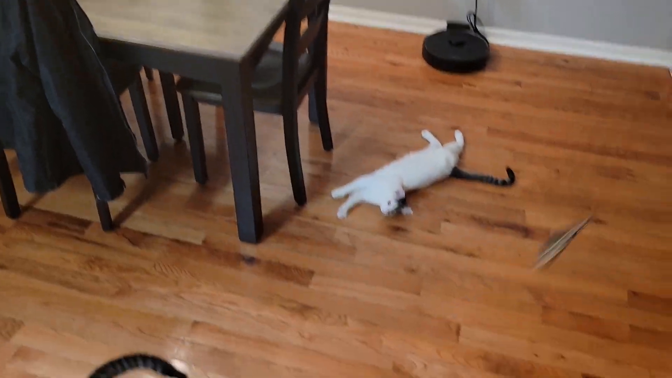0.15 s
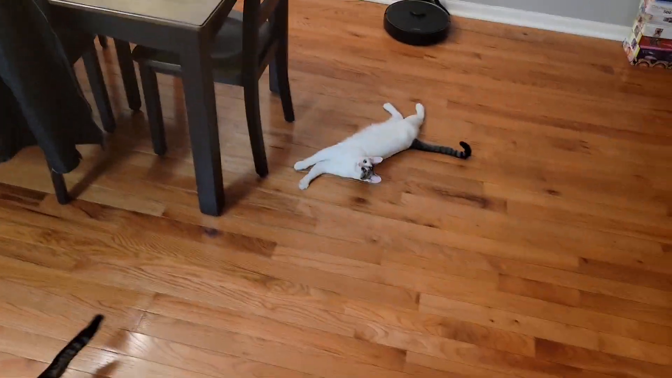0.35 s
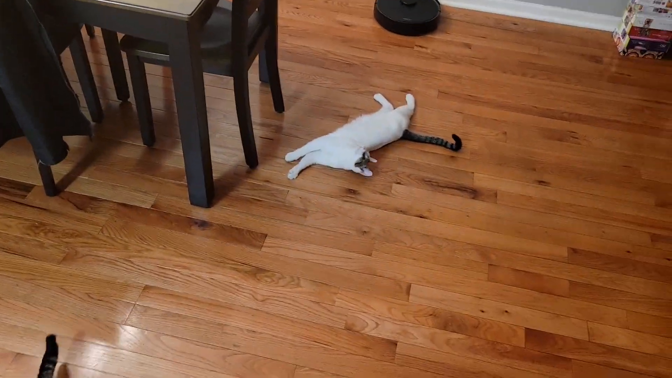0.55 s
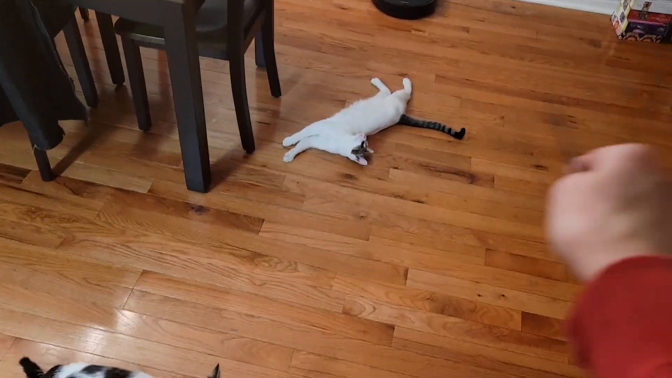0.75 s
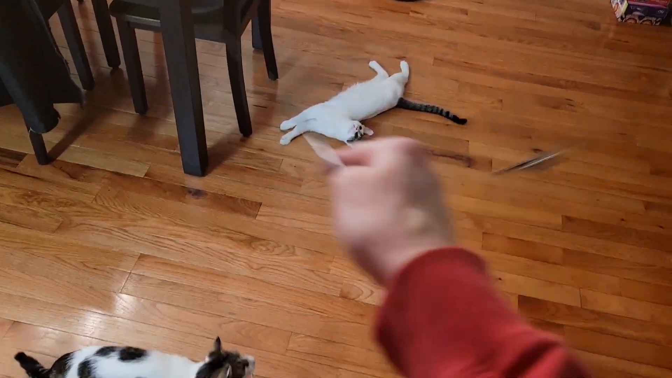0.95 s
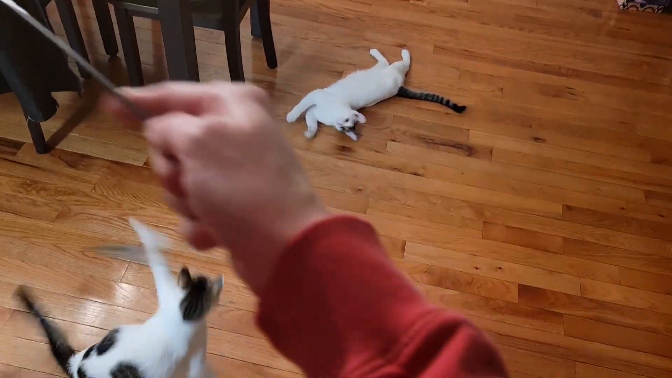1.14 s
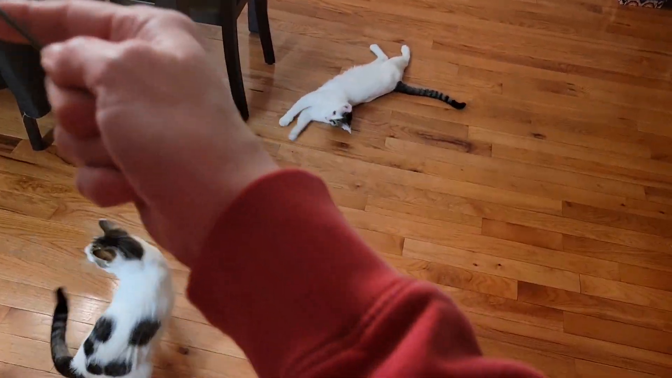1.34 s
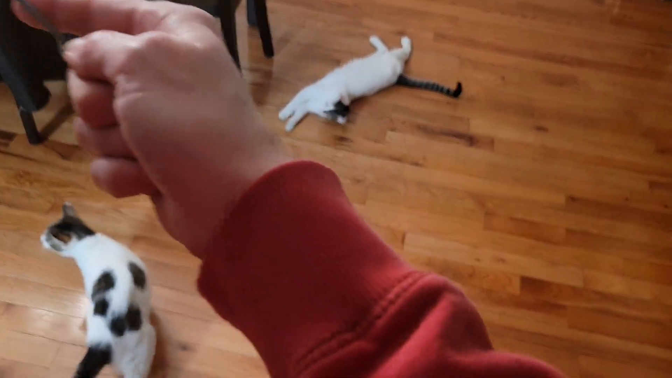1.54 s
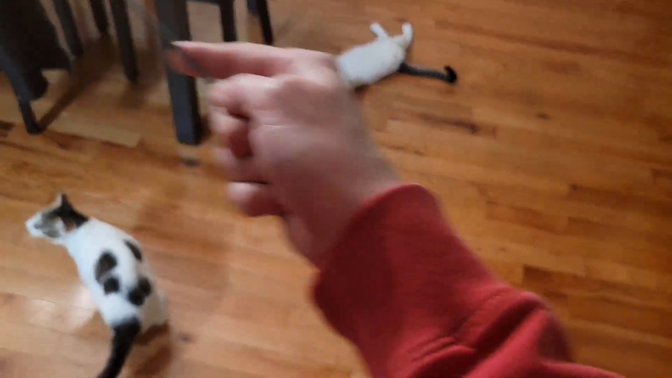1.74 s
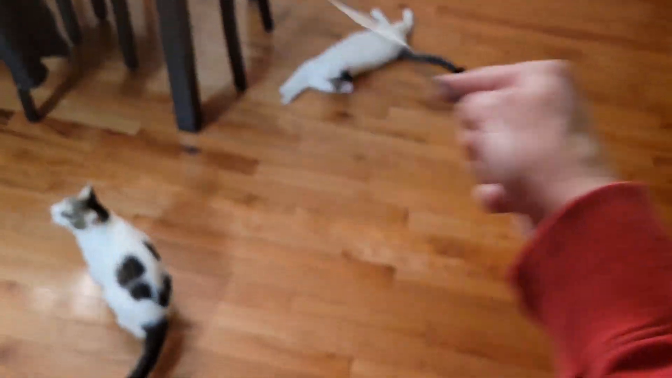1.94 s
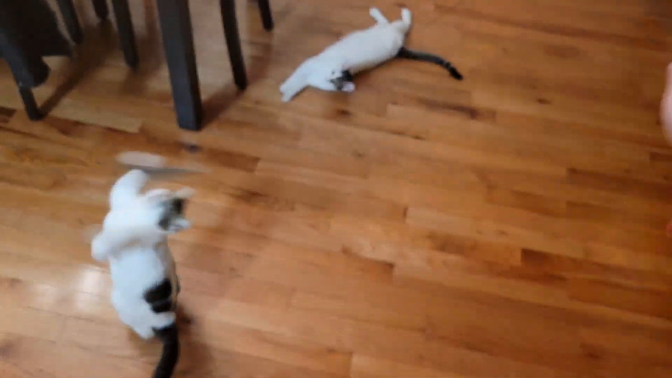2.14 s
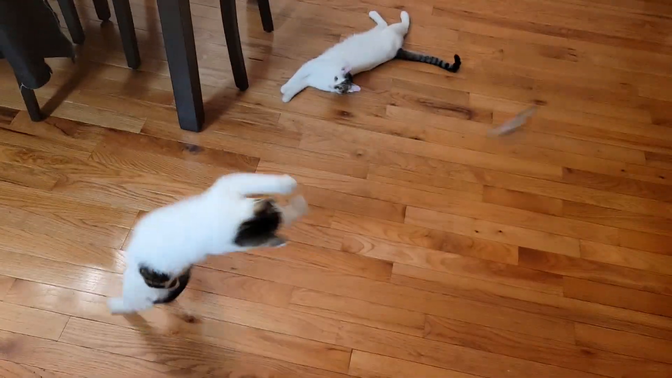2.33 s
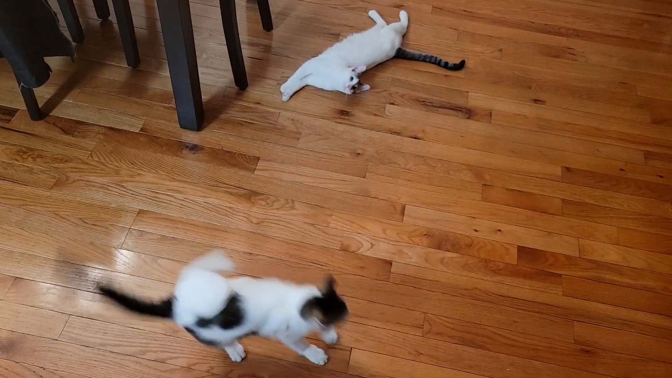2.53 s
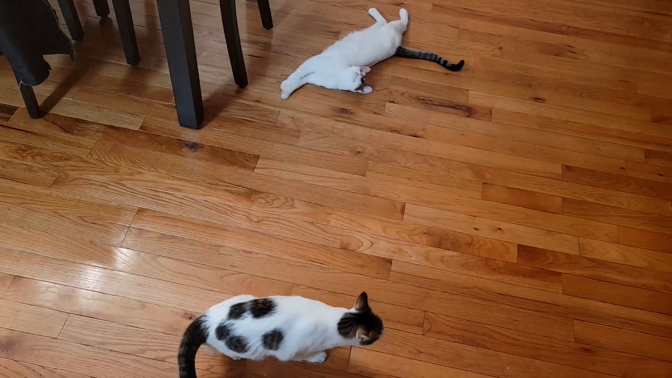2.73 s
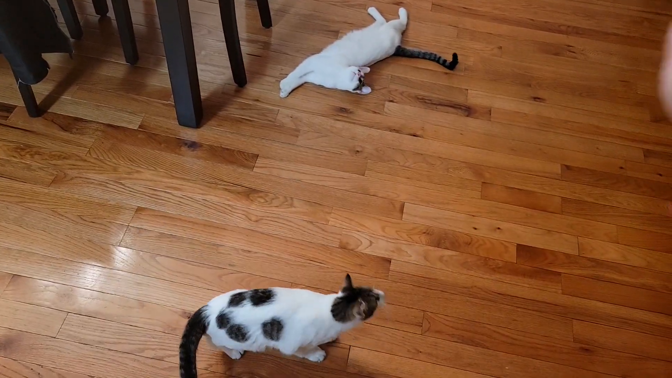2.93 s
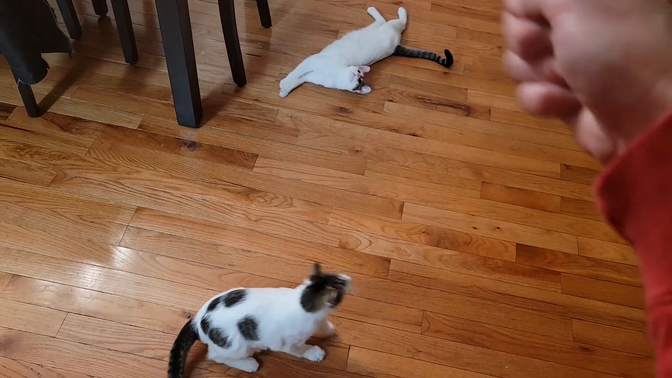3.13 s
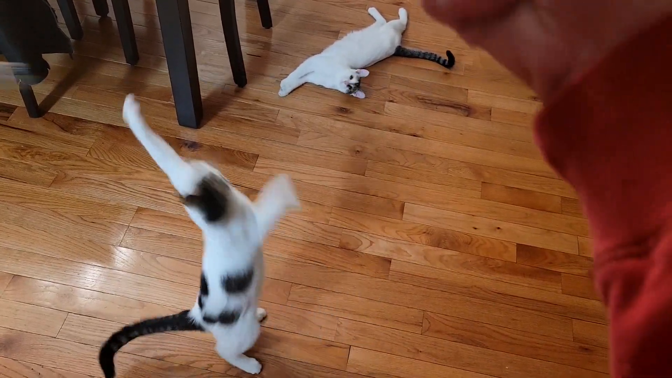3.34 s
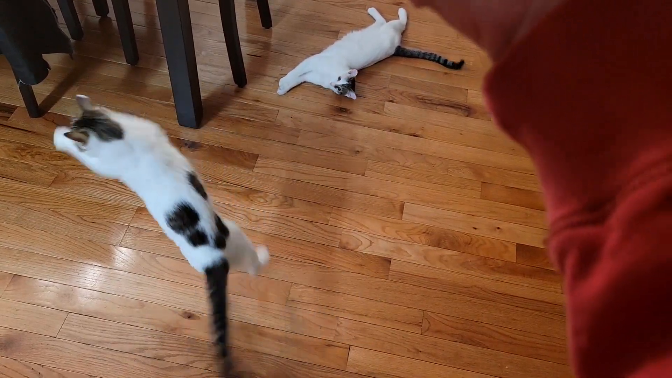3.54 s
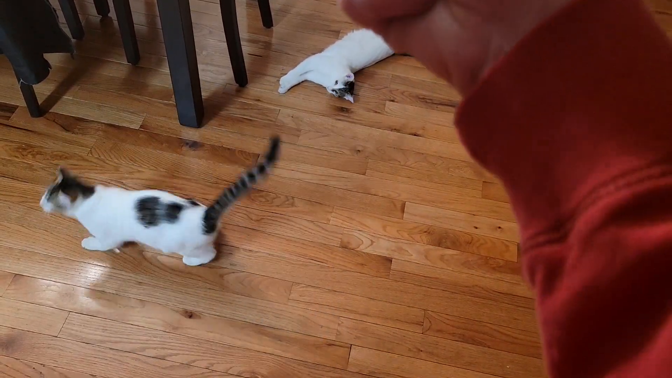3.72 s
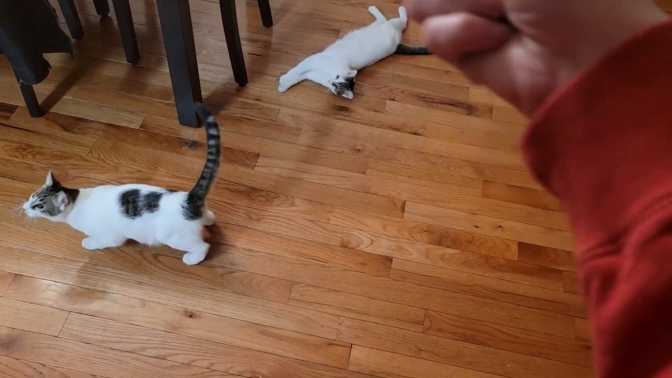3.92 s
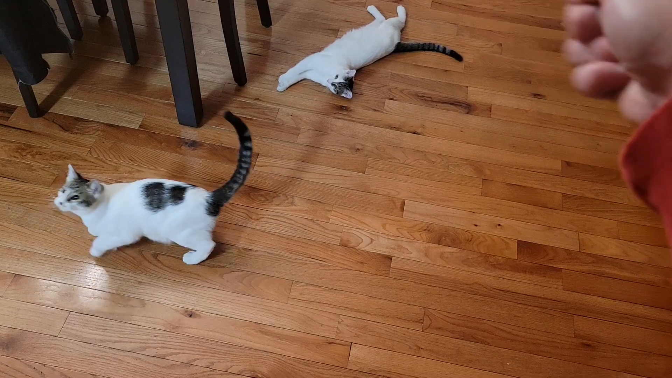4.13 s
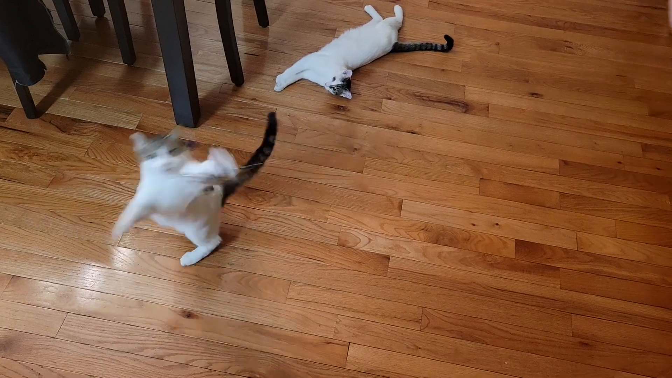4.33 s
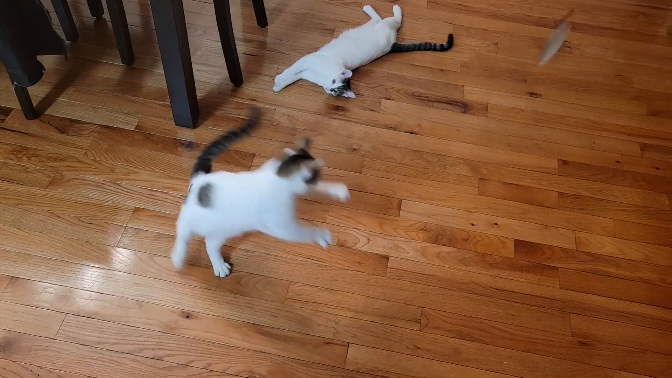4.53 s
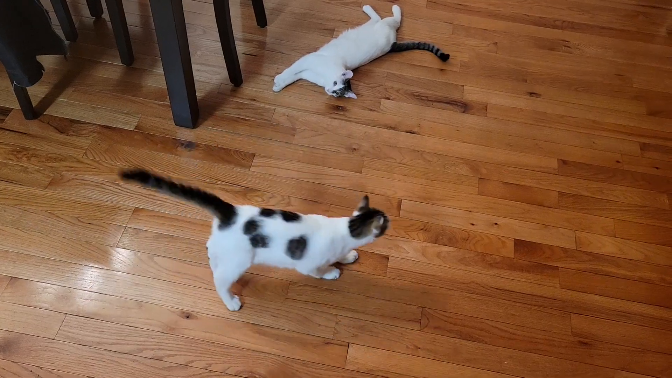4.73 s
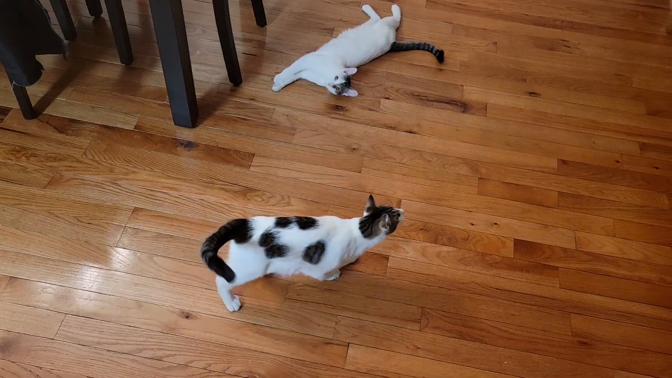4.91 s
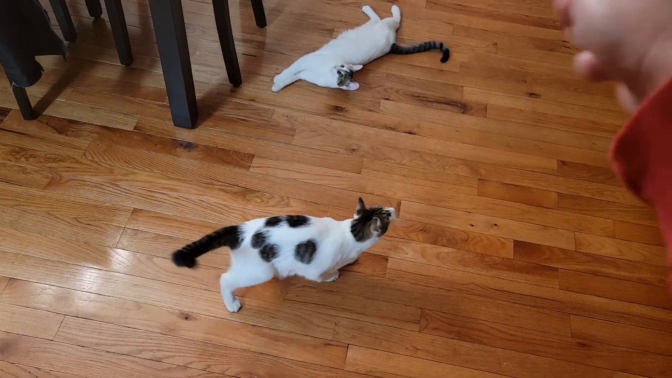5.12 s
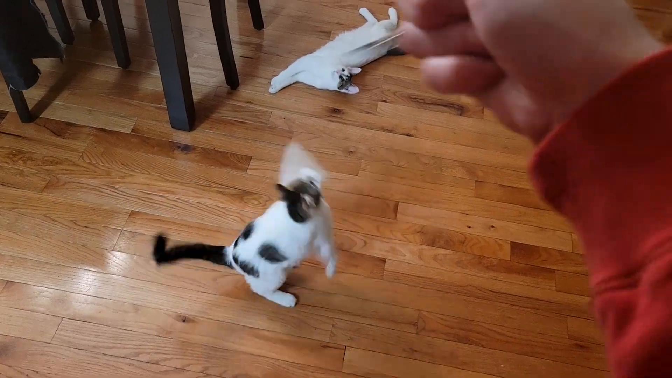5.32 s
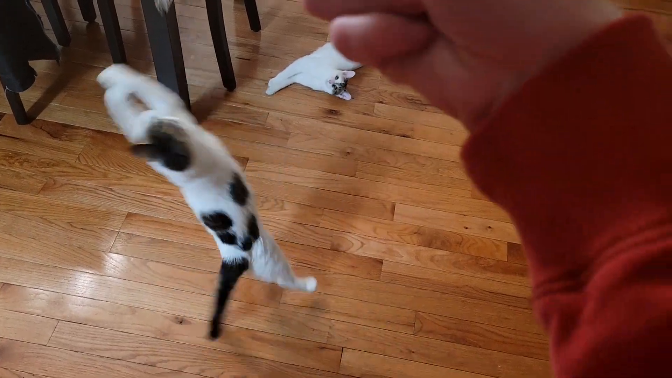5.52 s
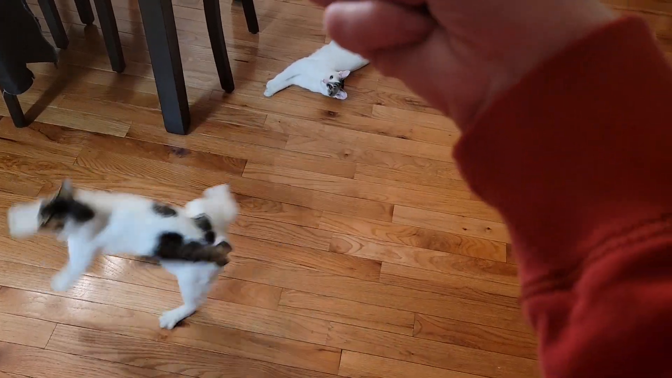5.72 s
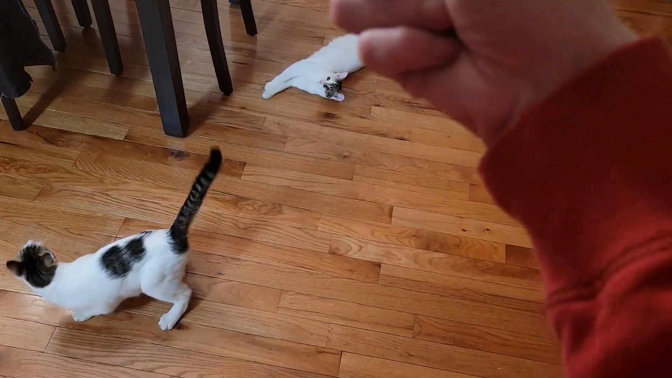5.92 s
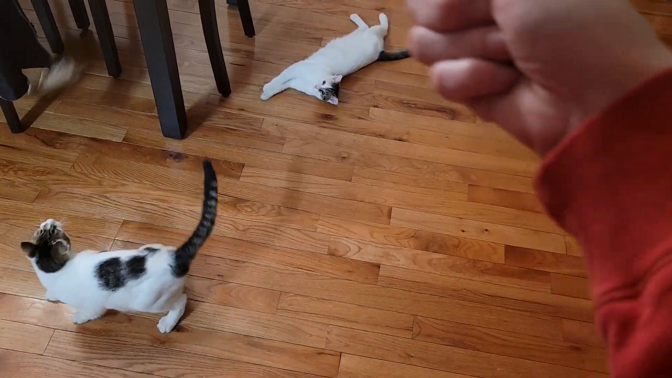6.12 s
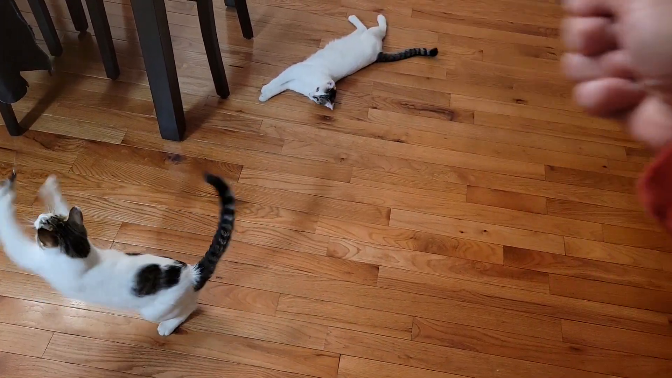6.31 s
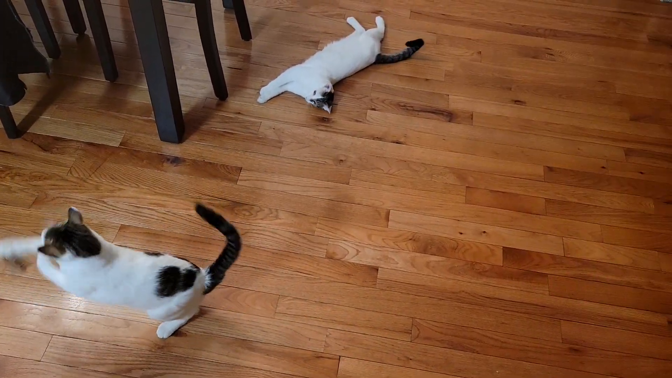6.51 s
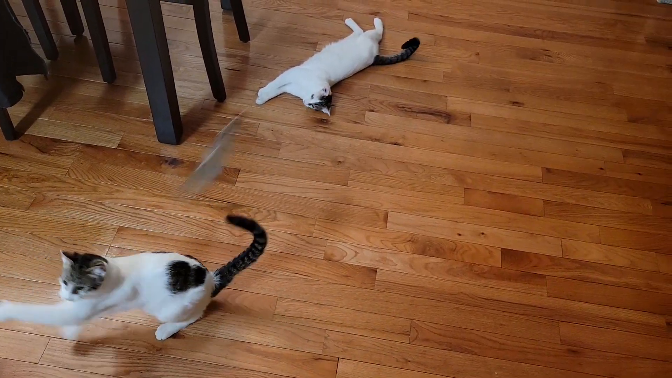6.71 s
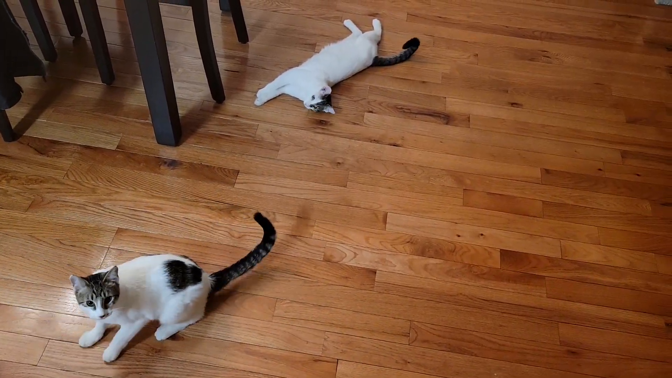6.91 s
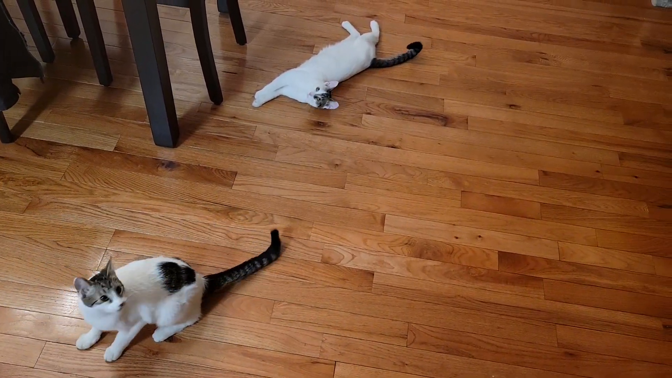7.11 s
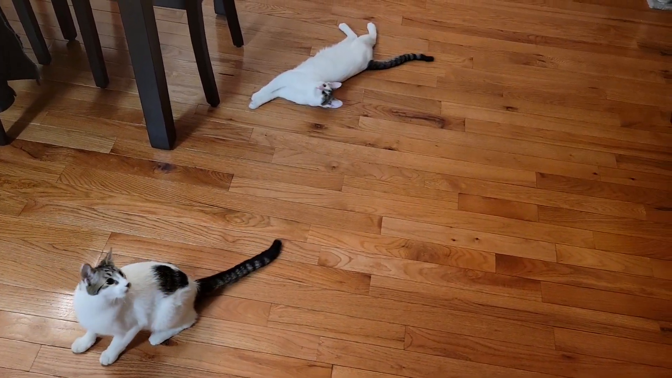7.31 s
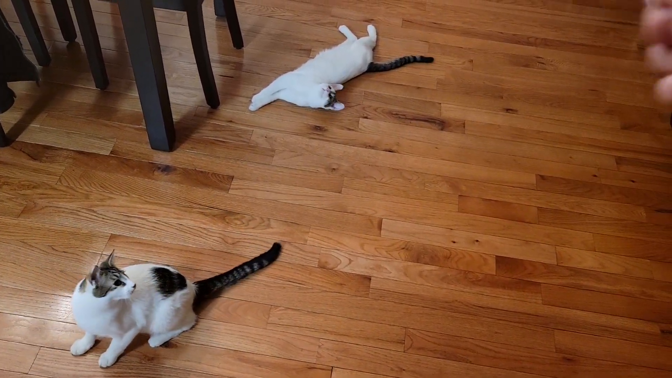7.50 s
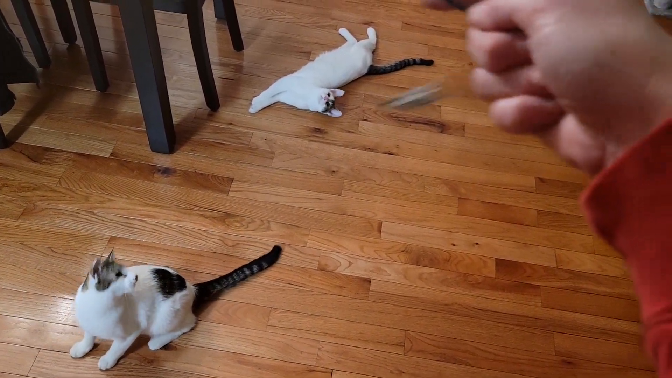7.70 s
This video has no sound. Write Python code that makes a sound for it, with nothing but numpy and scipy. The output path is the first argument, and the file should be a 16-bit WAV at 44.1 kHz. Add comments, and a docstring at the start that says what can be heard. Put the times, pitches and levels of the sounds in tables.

```python
"""Paws of a cat chasing a feather wand land on a hardwood floor in a quiet dining room.
Each landing is a boom of decaying sines (boards and floor modes) under a filtered-noise slap and crack.
Claw taps, scuffs and feather wisps are short noise bursts with a ringing region; toy knocks ring a few modes.
Dry grip ticks sit close to the left microphone; contact sounds feed a diffuse room tail.
Below lie steady house noise, a hum, a faint high whine and a low rumble that swells after each landing."""
import sys
import numpy as np
from scipy import signal
from scipy.fft import rfft, irfft
from scipy.io import wavfile
from scipy.ndimage import uniform_filter1d

SR = 44100
rng = np.random.default_rng(int(sys.argv[2]) if len(sys.argv) > 2 else 0)


def unload_audio(sound):
    """Save the sound as a 16-bit wav file, at the path given as the first command line argument."""
    columns = np.transpose(np.atleast_2d(sound))
    # keep every value between -1 and 1, then stretch to whole-number steps
    steps = np.round(np.clip(columns, -1, 1) * 32767)
    wavfile.write(sys.argv[1], SR, steps.astype(np.int16))


N = 341982  # length in samples

# steady noise of air and appliances, relative spectrum: f/Hz, density/dB
HOUSE_SPECTRUM = [(18, -35), (30, -18), (48, -9), (108, -12), (144, -18.5), (165, -13), (244, 0),
                  (278, -10.5), (401, -8.5), (1030, -20.5), (1140, -19.5), (2320, -31.5), (7160, -38.5),
                  (15700, -33.5)]
# likeness of left and right in the house noise: f/Hz, correlation/1
HOUSE_LIKENESS = [(60, 0.95), (130, 1), (290, 0.84), (640, 0.097), (1400, 0.91), (3100, 0.4), (7000, 0.55),
                  (15000, 0.055)]
# phase by which the left leads in the house noise: f/Hz, phase/rad
HOUSE_LEFT_LEAD = [(30, 0.5), (430, -0.25), (1210, -2.5), (2670, -1.5), (3700, -1.7), (7400, -5.5)]
# balance of the house noise, left minus right: f/Hz, level/dB
HOUSE_BALANCE = [(60, 0.5), (180, -1), (550, 4), (1650, 1), (4970, 1.5), (15000, 5)]
# slow level curve of the high whine: t/s, level/dB
WHINE_LEVEL = [(0, -88), (1.3, -90), (2.5, -96), (3.8, -94), (4.1, -87), (5.2, -88), (5.6, -97),
               (7.75, -98)]
# decay of the room tail: f/Hz, t60/s
ROOM_DECAY = [(60, 0.48), (280, 0.39), (740, 0.36), (1900, 0.31), (4000, 0.33), (10400, 0.24)]
# likeness of left and right in the room tail: f/Hz, correlation/1
TAIL_LIKENESS = [(130, 1), (300, 0.65), (600, 0.067)]
# dry ticks, probably the grip shifting: t/s, level/dB
GRIP_TICKS = [(0.035, -39), (0.067, -44), (0.095, -40.5), (0.126, -36), (0.139, -43), (0.184, -41),
              (0.254, -41.5), (0.282, -38.5), (0.65, -40.5), (0.665, -41.5), (0.683, -48), (0.701, -48)]
# colour of the casing, relative: f/Hz, level/dB
CASING_COLOUR = [(200, -3), (600, 9), (1500, -11), (3000, -13.5), (6000, -20), (14000, -50)]
# faint narrow wisps, probably the feather or its string whisking past: t/s, level/dB, ring f/Hz
WISP_EVENTS = [(0.455, -60.5, 7360), (1.7488, -67.5, 3500), (3.0682, -61, 3600), (3.21, -63, 7060),
               (3.9937, -66, 12000), (4.463, -67, 5190), (4.5244, -72, 7870), (4.5348, -64, 3960),
               (5.5536, -53.5, 6600), (7.511, -61, 9600)]
# scuffs of paws, feather and sleeve:
# t/s, level/dB, ring f/Hz, tilt/(dB per octave), fade length/s, left minus right/dB
SCUFF_EVENTS = [(0.056, -63, 2350, -3.5, 0.083, 4.5), (0.145, -62, 3440, -7, 0.039, 5.5),
                (0.1837, -59, 2580, -5.5, 0.038, 15.5), (0.294, -57, 3700, -7.5, 0.029, 13.5),
                (0.333, -61, 2220, -3.5, 0.037, 14.5), (1.154, -56.5, 2270, 1, 0.037, 4),
                (1.925, -63.5, 3120, -2, 0.065, 13), (2.2144, -40.5, 2780, 0.2, 0.021, 3.5),
                (2.261, -58, 2830, -1.5, 0.061, 1.5), (3.723, -64, 2140, -8, 0.03, 16),
                (4.683, -65, 2730, -7, 0.022, 5.5), (5.4166, -44.5, 2800, -2, 0.025, 7),
                (5.424, -47, 2750, -4, 0.032, 4.5), (5.462, -51, 2780, -1, 0.042, 3),
                (5.4985, -49.5, 2400, -1, 0.014, 10), (5.564, -60.5, 4610, -0.5, 0.043, 6.5),
                (5.8086, -55, 2770, -5.5, 0.03, 9), (6.355, -50.5, 2290, -0.2, 0.061, 3),
                (6.4005, -46, 4440, .6, 0.023, 2.5), (6.528, -56.5, 2600, 2.5, 0.077, 5),
                (6.6236, -45.5, 3350, -0.5, 0.023, 2.5), (6.78, -53.5, 3460, -6, 0.019, 7),
                (7.234, -50.5, 5770, -2.5, 0.02, 2.5), (7.399, -62, 2600, 1, 0.028, 2.5),
                (7.701, -66, 3100, -3, 0.04, 4.5)]
# sharp taps of claw or toy on wood: t/s, level/dB, ring f/Hz, ring above the rest/dB, tilt/(dB per octave)
TAP_EVENTS = [(2.2013, -32, 3000, -4, -2.5), (2.2121, -33, 2500, 1.5, -2.5), (2.2924, -48, 2590, 0, 5),
              (2.5232, -30.5, 2830, 6.5, -12), (2.629, -50, 1910, 9, -9.5), (3.3977, -56.5, 1870, 8, -3),
              (3.674, -55, 2600, 12, -2), (4.3582, -39, 1860, 12, -0.5), (4.681, -57.5, 1870, 6, -4),
              (5.4106, -48.5, 2730, -3, -10), (5.488, -44.5, 4770, 17, 3), (5.609, -51, 6650, 7, 5),
              (5.7377, -50.5, 2470, 7, -3), (5.8282, -32, 1870, -9.5, -20), (6.356, -46.5, 1820, 15, 2.5),
              (6.621, -32, 6070, 4, -2), (6.766, -52, 8500, 1, -5), (6.859, -54, 7000, 1, -6),
              (7.223, -36.5, 3370, 13.5, 4), (7.2293, -42, 5770, 32, -1), (7.4, -49.5, 3870, 11, 5.5)]
# the hard end of the toy knocks the floor: t/s, level/dB
TOY_HITS = [(6.767, -38), (6.859, -51)]
# modes of the toy, relative: f/Hz, level/dB, t60/s
TOY_MODES = [(2600, 0, .03), (3500, 0, .035), (4300, -7, .025), (5300, -11, .02)]
# resonant humps shared by all planks: f/Hz, width/Hz, level/dB
PLANK_HUMPS = [(1070, 140, 3), (1480, 200, 1), (1820, 190, 6), (2775, 95, 9), (3860, 350, 19)]
# modes of floor and room, relative to the local board pitch: f/Hz, level/dB, t60/s
FLOOR_MODES = [(36.5, -21, 1), (56.2, -11, 0.28), (112.9, -13, 0.38), (152.4, 0.5, 0.12), (242, -8, 0.38),
               (288, -29, 0.32)]
# colour of the pad slap, relative: f/Hz, level/dB
SLAP_COLOUR = [(120, 0.5), (250, 6.5), (500, -4), (900, -35.5), (2000, -56)]
# colour of the claw and skin crack, relative: f/Hz, level/dB
CRACK_COLOUR = [(400, -3), (1000, 0.5), (2000, -7), (3500, -20), (6000, -63), (12000, -81)]
# paws landing: t/s, boom peak level/dB, board f/Hz, pad slap level/dB, claw and skin crack level/dB, plank f/Hz
PAW_LANDINGS = [(0.509, -50, 67.4, -62, -78, 900), (1.274, -38.5, 79.5, -52.5, -56.5, 835),
                (1.416, -33.5, 72.6, -57, -62, 743), (1.463, -41, 69.4, -58.5, -79, 724),
                (2.093, -49, 77, -65, -69, 834), (2.522, -29, 77.3, -35.5, -33.5, 850),
                (2.559, -30.5, 128.5, -40.5, -42, 700), (2.629, -35, 78, -43, -42.5, 1220),
                (3.687, -43.5, 76, -57.5, -61, 810), (3.724, -62, 113, -56.5, -48.5, 1100),
                (3.736, -28.5, 61, -51.5, -45, 2000), (3.819, -33.5, 45, -60, -82, 729),
                (4.126, -47.5, 64, -73, -88, 851), (4.459, -48.5, 59, -59.5, -68, 851),
                (4.664, -38, 62, -51, -49.5, 1130), (4.73, -45, 70, -52, -62, 703),
                (5.735, -33, 72.5, -46, -42.5, 700), (5.779, -29.5, 128.4, -49, -62, 867),
                (5.819, -26, 99.7, -39.5, -42, 600), (5.827, -27, 53.7, -41, -38, 1600),
                (6.185, -46, 67, -58.5, -83, 710), (6.772, -47, 97, -67, -66, 770)]
# colour of the microphones: f/Hz, level/dB
MIC_COLOUR = [(25, -11), (45, -4.5), (60, 4.5), (5000, -4.5), (6200, -7.5), (7600, -2.5), (8600, -8.5),
              (10000, -12.5), (12800, -8.5), (15500, -12.5)]
# how much brighter the right microphone is than the left: f/Hz, level/dB
RIGHT_BRIGHTNESS = [(3000, 0), (9000, 3.5)]

LEAD_IN = 512  # samples of silence before a burst, room for its filter
HOUSE_DB = -56.5
HUM_HZ, HUM_DB = 59.6, -68.5
WHINE_HZ = 13986
RUMBLE_DB = -63.5  # the steady part
SHUDDER_DB, SHUDDER_RISE_S, SHUDDER_T60_S = -15, 0.042, 0.92  # dB relative to the boom of each landing
WISP_RING_DB, WISP_TILT_DB_PER_OCT, WISP_S, WISP_PAN_DB = 13.5, 2.5, 0.04, 3.5
SCUFF_RING_DB = 5.5  # ring above the rest
TAP_S, TAP_PAN_DB = 0.0048, 4.5
RATTLE_PER_S, RATTLE_S = 150, 0.036  # density and fade of the chatter after a toy knock
BRIGHT_DB_PER_OCT, LANDING_PAN_DB = -2.5, 3
EDGE_HZ = 15850  # upper band limit


def gain_of(db):
    """Turns decibels into an amplitude factor."""
    return 10 ** (np.asarray(db) / 20)


def evened(x):
    """Scales to rms 1."""
    return x / np.sqrt(np.mean(x ** 2) + 1e-20)


def read(points, hz):
    """Reads a spectrum curve on a log-frequency axis."""
    f, value = np.transpose(points)
    return np.interp(np.log(hz + 1), np.log(f + 1), value)


def add(mix, s, sound, pan_db, lag_per_db=3.0):
    """Places a stereo sound: positive pan is louder on the left and reaches the right some samples later."""
    left_start = round(s * SR)
    right_start = round(s * SR + lag_per_db * pan_db)
    for channel, side, start in ((0, 1, left_start), (1, -1, right_start)):
        part = mix[channel, max(start, 0):][:sound.shape[1]]
        part += gain_of(side * pan_db / 2) * sound[channel, :len(part)]


def coloured(x, shape_db):
    """Filters x by a dB function of frequency, keeping the overall level of each channel."""
    gain = gain_of(shape_db(np.fft.rfftfreq(x.shape[1], 1 / SR)))
    out = irfft(rfft(x) * gain, x.shape[1])
    return out * np.linalg.norm(x, axis=1, keepdims=True) / np.linalg.norm(out, axis=1, keepdims=True)


def burst(length, rise, lumps_db, same=0.75):
    """Grainy friction noise, partly alike at both microphones: a quick rise, then a rounded fade."""
    t = (np.arange(round(4 * length * SR) + 2 * LEAD_IN) - LEAD_IN) / SR
    envelope = np.clip(t / rise, 0, 1) * np.exp(-(t / length) ** 2)
    grain, left, other = rng.standard_normal((3, len(t)))
    lumps = gain_of(lumps_db * evened(uniform_filter1d(grain, size=90)))
    right = same * left + np.sqrt(1 - same ** 2) * other
    out = envelope * lumps * np.array([left, right])
    return out * np.linalg.norm(envelope) / np.linalg.norm(out, axis=1, keepdims=True)


def contacts(table, rise_share, lumps_db, width_oct, bass_hz=1500):
    """Friction bursts with a tilted wide spectrum and one ringing region; small things radiate little bass."""
    out = np.zeros((2, N))
    for s, level_db, hz, ring_db, tilt_db, length, pan_db in table:
        def shape(f):
            octaves = np.log2(np.maximum(f, bass_hz) / hz)
            thin_db = -20 * np.log10(1 + (bass_hz / (f + 1)) ** 2)
            return thin_db + tilt_db * octaves + ring_db * np.exp(-(octaves / width_oct) ** 2)
        length = np.clip(length, 0.001, 0.065)
        friction = burst(length, rise_share * length, lumps_db)
        add(out, s - LEAD_IN / SR, gain_of(level_db) * coloured(friction, shape), pan_db)
    return out


def stereo_noise(shape_db, patchy_db):
    """Random short-time spectra, patchy in time and pitch, as two microphones close together hear them."""
    frames, hz = N // 256 + 5, np.fft.rfftfreq(1024, 1 / SR)
    a, b, c, d, patches = rng.standard_normal((frames, 513, 5)).T
    patches = uniform_filter1d(patches, size=10, axis=0)  # across frequency
    patches = evened(uniform_filter1d(patches, size=12, axis=1))  # across time
    same = read(HOUSE_LIKENESS, hz)[:, None]
    left, other = a + 1j * b, c + 1j * d
    right = same * left + np.sqrt(1 - same ** 2) * other
    right = right * np.exp(-1j * read(HOUSE_LEFT_LEAD, hz))[:, None]
    half_balance = gain_of(read(HOUSE_BALANCE, hz) / 2)[:, None]
    spectrum = np.array([left * half_balance, right / half_balance])
    spectrum = spectrum * gain_of(shape_db(hz)[:, None] + patchy_db * patches)
    return evened(signal.istft(spectrum, nperseg=1024, noverlap=768)[1][:, :N])


def rumble_level(t):
    """Gain of the steady rumble plus a shudder that swells and dies after each landing, summed as power."""
    power = gain_of(2 * RUMBLE_DB) * np.ones(len(t))
    for s, boom_db, *_ in PAW_LANDINGS:
        age = np.maximum(t - s, 0)
        shudder_db = boom_db + SHUDDER_DB - 60 * age / SHUDDER_T60_S
        power += gain_of(2 * shudder_db) * (1 - np.exp(-age / SHUDDER_RISE_S))
    return np.sqrt(power)


def house():
    """Air and appliance noise, a steady sine hum, low rumble noise shaken up by landings, a high sine whine."""
    t = np.arange(N) / SR
    air = gain_of(HOUSE_DB) * stereo_noise(lambda hz: read(HOUSE_SPECTRUM, hz), patchy_db=1.43)
    rumble_shape = [(30, -15.5), (58, 0.5), (90, -23), (300, -80)]  # f/Hz, level/dB
    rumble = rumble_level(t) * stereo_noise(lambda hz: read(rumble_shape, hz), patchy_db=1.5)
    whine_gain = gain_of(np.interp(t, *np.transpose(WHINE_LEVEL)))
    whine = whine_gain * np.sin(2 * np.pi * WHINE_HZ * t)
    hum = gain_of(HUM_DB) * np.sin(2 * np.pi * HUM_HZ * t)
    return hum + air + rumble + whine


def room(x, first_s=0.0018):
    """Diffuse noise tail, each band dying at its own speed; three tails take turns so like hits differ."""
    out = np.zeros((2, N))
    turn = (np.arange(N) // (SR // 5)) % 3  # a new tail every 0.2 s
    for k in range(3):
        hz, t, z = signal.stft(rng.standard_normal((2, SR * 3 // 4)), SR, nperseg=512)
        same = read(TAIL_LIKENESS, hz)[:, None]
        z[1] = same * z[0] + np.sqrt(1 - same ** 2) * z[1]
        decay = gain_of(-60 * t / read(ROOM_DECAY, hz)[:, None])
        tail = signal.istft(z * decay, SR, nperseg=512)[1]
        # silent up to first_s, full from twice that
        tail *= np.clip(np.arange(tail.shape[1]) / SR / first_s - 1, 0, 1)
        tail /= np.linalg.norm(tail, axis=1, keepdims=True)
        out += signal.fftconvolve(x * (turn == k), tail, axes=1)[:, :N]
    return out


def grip():
    """Single dry ticks without room, close to the left: one impulse each through the colour of the casing."""
    out, impulse = np.zeros((2, N)), np.zeros((2, 2 * LEAD_IN))
    impulse[:, LEAD_IN] = 1
    tick = coloured(impulse, lambda f: read(CASING_COLOUR, f))
    tick = tick / abs(tick).max()
    for s, level_db in GRIP_TICKS:
        add(out, s - LEAD_IN / SR, gain_of(level_db) * tick, pan_db=12.5, lag_per_db=2.5)
    return out


def wisps():
    """Light things whisking past: faint noise bursts with a narrow, prominent ring."""
    rows = [(*row, WISP_RING_DB, WISP_TILT_DB_PER_OCT, WISP_S, WISP_PAN_DB) for row in WISP_EVENTS]
    return contacts(rows, rise_share=0.05, lumps_db=-4.5, width_oct=0.17)


def scuffs():
    """Rubbing paws, feather and sleeve: lumpy noise bursts with a mild ring."""
    rows = [(s, db, hz, SCUFF_RING_DB, *rest) for s, db, hz, *rest in SCUFF_EVENTS]
    return contacts(rows, rise_share=0.4, lumps_db=4.0, width_oct=0.3, bass_hz=1000)


def taps():
    """Claw or toy striking wood: very short noise bursts, each with its own ring and tilt."""
    rows = [(*row, TAP_S, TAP_PAN_DB) for row in TAP_EVENTS]
    return contacts(rows, rise_share=0.33, lumps_db=4.0, width_oct=0.29)


def toy():
    """Each knock and its random chatter of weaker ones excite the same few decaying modes of the toy."""
    out, t = np.zeros((2, N)), np.arange(SR // 5) / SR
    ring = sum(gain_of(db - 60 * t / t60) * np.sin(2 * np.pi * hz * t) for hz, db, t60 in TOY_MODES)
    ring = ring / abs(ring).max()
    for s, level_db in TOY_HITS:
        chance, size = rng.random((2, len(t)))
        chatter = (chance < RATTLE_PER_S / SR) * (size - 0.5) * np.exp(-t / RATTLE_S)
        first_hit = t == 0
        knock = signal.oaconvolve(chatter + first_hit, ring)[:len(t)]
        add(out, s, gain_of(level_db) * np.array([knock, knock]), TAP_PAN_DB)
    return out


def wood(hz, plank_hz, plank_db=6.5, plank_oct=0.44):
    """Resonant humps shared by all planks, plus the broad one of the plank that is hit, in dB."""
    own = plank_db * np.exp(-(np.log2((hz + 1) / plank_hz) / plank_oct) ** 2)
    shared = sum(db / (1 + (2 * (hz - f) / width) ** 2) for f, width, db in PLANK_HUMPS)
    return own + shared


def boom(level_db, hz, t60=0.17, push_s=0.0097, swell_s=0.025):
    """A soft paw pushes the boards: local pitch plus floor and room modes, swelling as the weight follows."""
    t = np.arange(SR * 3 // 4) / SR
    modes = [(hz, 0, t60)] + list(FLOOR_MODES)
    ring = sum(gain_of(db - 60 * t / decay_s) * np.sin(2 * np.pi * f * t) for f, db, decay_s in modes)
    swelling = ring * (1 - np.exp(-t / swell_s))
    push = np.hanning(max(round(push_s * SR), 3))  # the soft pad smooths the blow
    out = signal.oaconvolve(swelling, push)[:len(t)]
    return gain_of(level_db) * np.array([out, out]) / abs(out).max()


def slap():
    """Soft pad meeting the floor: a fast-rising, low-coloured noise burst nearly alike on both sides."""
    pad = burst(length=0.029, rise=0.00067, lumps_db=2.0, same=0.93)
    return coloured(pad, lambda f: read(SLAP_COLOUR, f))


def crack(plank_hz):
    """Claws and skin on wood: a short noise burst ringing through the planks."""
    def shape(f):
        tilt_db = BRIGHT_DB_PER_OCT * np.log2(np.clip(f, 500, 8000) / 1500)
        return read(CRACK_COLOUR, f) + wood(f, plank_hz) + tilt_db
    return coloured(burst(length=0.012, rise=0.002, lumps_db=4.0), shape)


def landings():
    """Paws hitting the floor: returns the booms, and the slaps and cracks that go on to ring in the room."""
    low, high = np.zeros((2, 2, N))
    for s, boom_db, hz, slap_db, crack_db, plank_hz in PAW_LANDINGS:
        add(low, s, boom(boom_db, hz), 0)
        add(high, s - LEAD_IN / SR, gain_of(slap_db) * slap(), LANDING_PAN_DB * 0.07)
        add(high, s - LEAD_IN / SR, gain_of(crack_db) * crack(plank_hz), LANDING_PAN_DB)
    return low, high


def scene():
    """Sums everything that reaches the two microphones; booms, grip and house stay out of the room tail."""
    low, high = landings()
    hard = taps() + toy()
    soft = scuffs() + wisps()
    wet = room(gain_of(2.0) * high + gain_of(-3.0) * hard + gain_of(-4.5) * soft)
    return low + high + hard + soft + wet + grip() + house()


def record(dry):
    """The colour of the microphones, the right one brighter, then a steep low-pass as the band limit."""
    hz = np.fft.rfftfreq(N, 1 / SR)
    colour_db = read(MIC_COLOUR, hz) + np.outer([-0.5, 0.5], read(RIGHT_BRIGHTNESS, hz))
    heard = irfft(rfft(dry) * gain_of(colour_db), N)
    low_pass = signal.firwin(511, EDGE_HZ, window=("kaiser", 9), fs=SR)
    return signal.oaconvolve(heard, low_pass[None], "same")


dry = scene()
out = record(dry)
unload_audio(out)
```